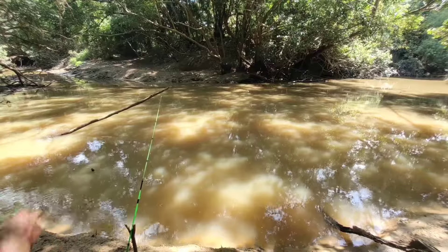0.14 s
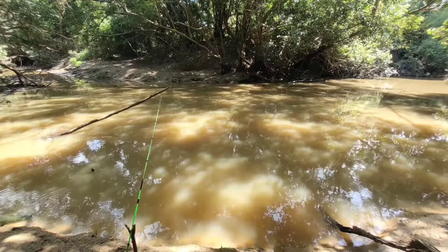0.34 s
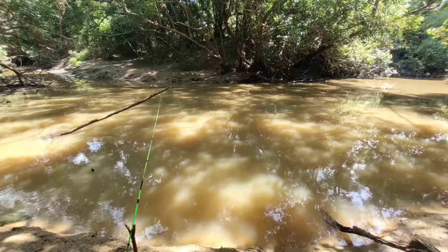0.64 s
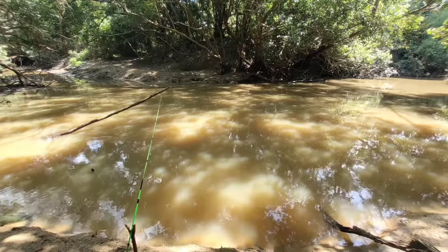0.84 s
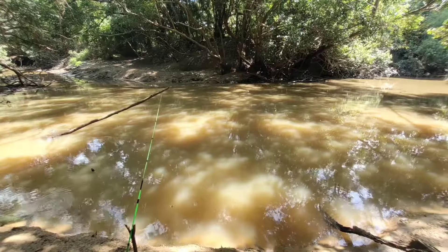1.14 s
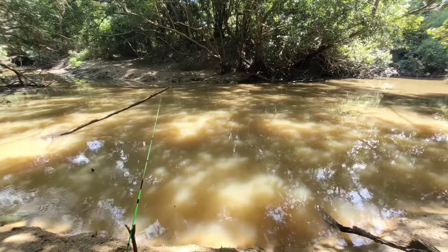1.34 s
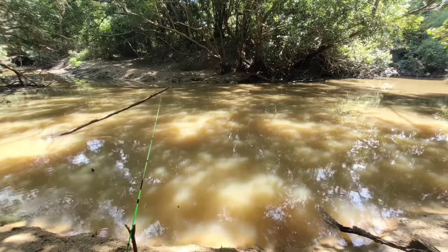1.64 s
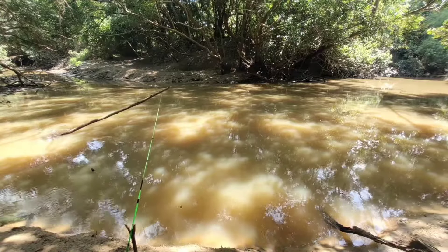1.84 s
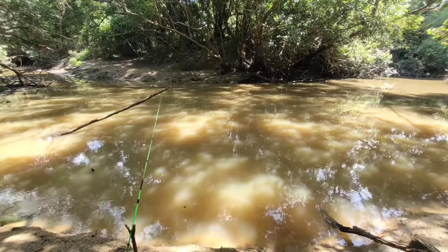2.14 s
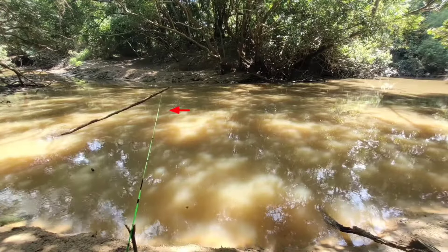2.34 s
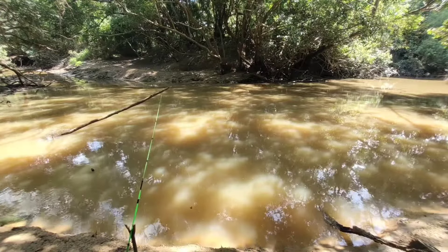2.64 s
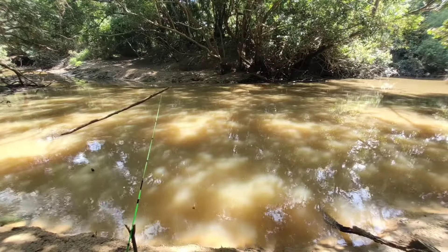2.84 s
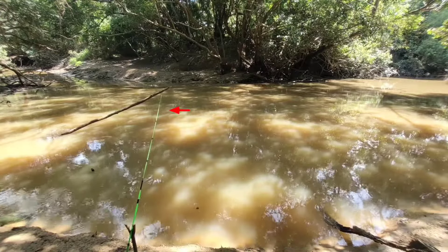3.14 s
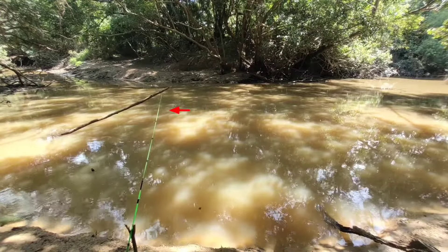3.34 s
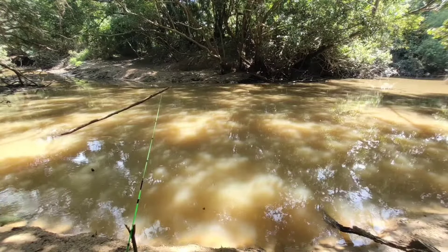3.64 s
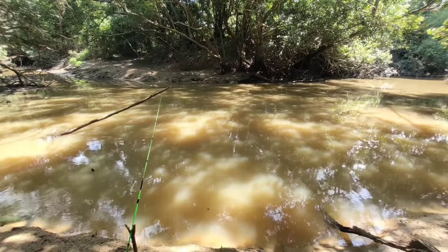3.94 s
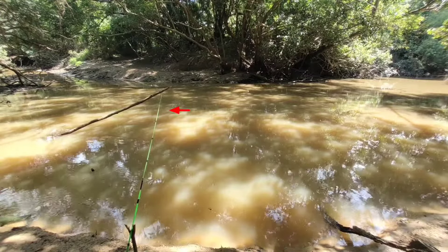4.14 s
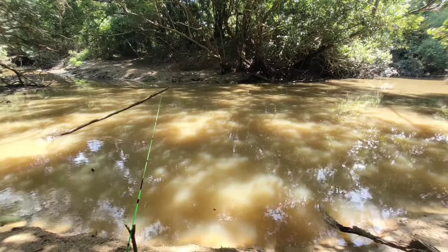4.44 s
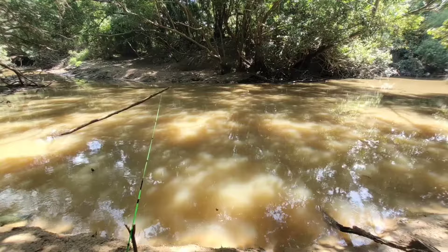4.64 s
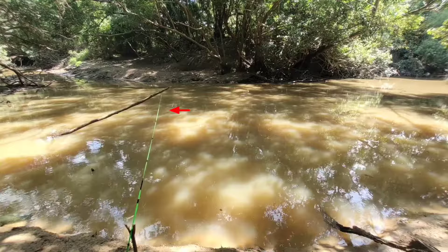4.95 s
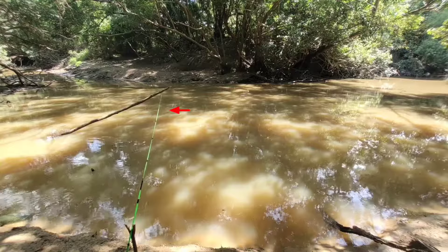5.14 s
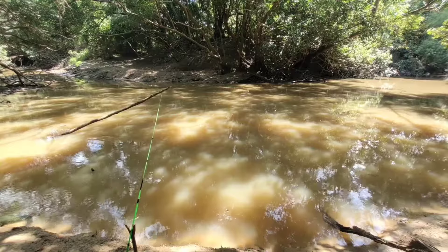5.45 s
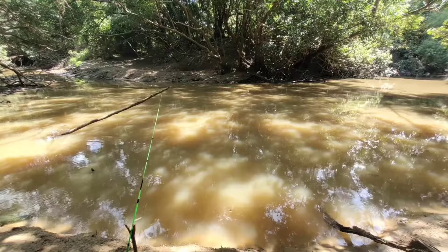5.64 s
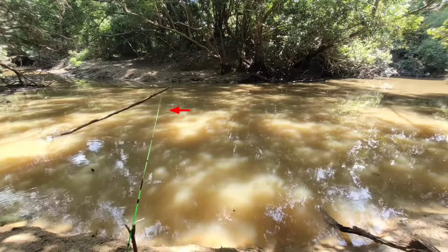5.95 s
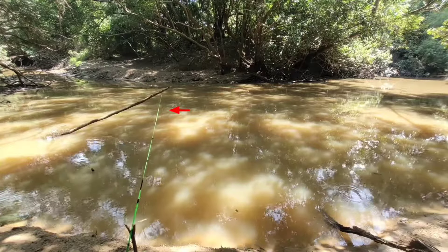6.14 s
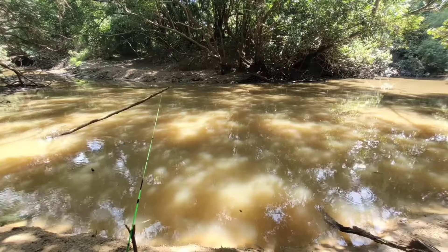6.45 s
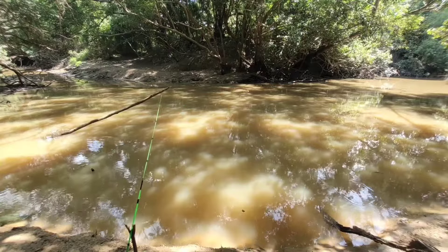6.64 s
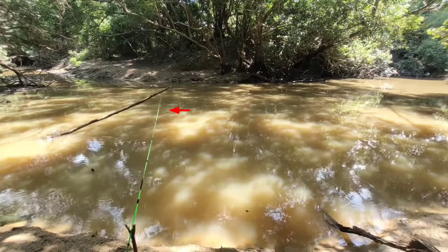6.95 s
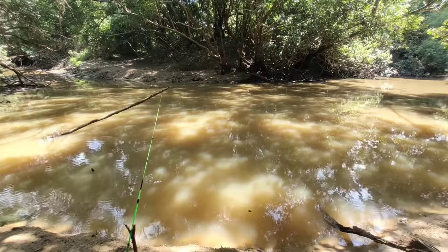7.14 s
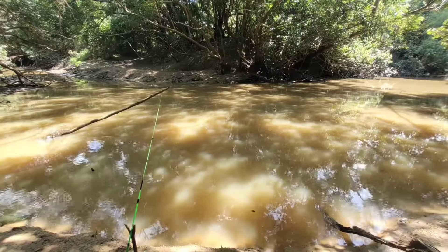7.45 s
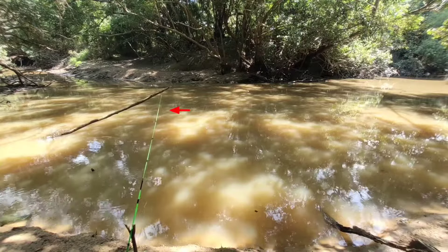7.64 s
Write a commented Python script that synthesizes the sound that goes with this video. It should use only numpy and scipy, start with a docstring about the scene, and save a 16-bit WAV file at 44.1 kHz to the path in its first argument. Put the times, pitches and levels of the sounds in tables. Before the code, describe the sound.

A near bird whistles short arched and falling notes on a wooded riverbank while another trills, over a dense, high, steady insect drone.

```python
"""A near bird whistles arched and falling notes on a wooded riverbank by day: gliding sine tones.
A second bird sings phrases with a low trill, and others whistle further off; decaying noise echoes stand for
the trunks that scatter every note into a grainy tail, which the recorder's noise suppressor cuts short.
A dense insect chorus of shaped noise drones above, with pulsing tones for single crickets and other insects.
Faint hiss, two puffs of breeze and two soft plops lie underneath."""
import sys
import numpy as np
from scipy import signal
from scipy.fft import rfft, irfft, next_fast_len
from scipy.io import wavfile
from scipy.ndimage import uniform_filter1d

SR = 44100
rng = np.random.default_rng(int(sys.argv[2]) if len(sys.argv) > 2 else 0)


def to_wav(s):
    """Save 16-bit WAV."""
    ch = np.atleast_2d(s).T  # columns
    pcm = np.round(np.clip(ch, -1, 1) * 32767)  # PCM
    wavfile.write(sys.argv[1], SR, pcm.astype(np.int16))


N = 343715  # length in samples
LEAD_S = .25  # bird tracks begin this early, so a note can already be sounding at the start

# near bird's two note shapes, before each note's own changes: time_s, pitch_hz, relative_level_db
ARCH_SHAPE = [(0, 3358, -34.5), (.008, 4150, -7.5), (.022, 4693, -7), (.042, 4860, -3.5), (.062, 4535, 0),
              (.088, 3760, -5.5), (.112, 3100, -14), (.13, 2860, -22.5)]
FALL_SHAPE = [(0, 5966, -8.5), (.008, 5800, -15), (.018, 5510, -5), (.037, 4888, -2), (.064, 4177, 0),
              (.092, 3459, -7.5), (.108, 3048, -16), (.125, 2887, -22)]
# when the near bird sings each shape: start_s, level_db, pitch_factor, length_factor
ARCH_NOTES = [(-.125, -30, 1.026, 0.95), (1.156, -29, .99, 0.97), (2.306, -27, 1.004, 1.12),
              (4.711, -24.5, 1, 1), (5.174, -26, 0.999, 1), (5.643, -26, 0.99, 0.96),
              (6.974, -28, .99, 0.96)]
FALL_NOTES = [(1.812, -29, 0.99, 0.99), (2.815, -28, 0.98, 1), (3.299, -27.5, 0.98, 1),
              (3.796, -28.5, 0.98, 1), (4.263, -27, 0.98, 0.99), (6.133, -28.5, 0.98, 0.96),
              (7.504, -29.5, 0.97, 0.96)]

# insect chorus, its tone balance: frequency_hz, relative_level_db
CHORUS_SPECTRUM = [(5000, -45.5), (5500, -36.5), (6000, -24.5), (6500, -7.5), (7100, 0.5), (7600, -4),
                   (8000, -6.5), (8400, -17), (9500, -26.5), (11300, -35), (12200, -24.5), (13000, -11),
                   (14300, -2), (15600, -9)]
CHORUS_DB = -42.5
# louder bursts of single insects, named by rough pitch: start_s, length_s, level_db
BURSTS_7K = [(0.019, 0.072, -43), (0.118, 0.2, -41), (0.332, 0.15, -43.5), (0.507, 0.043, -45),
             (0.569, 0.19, -43), (0.751, 0.053, -49), (0.867, 0.17, -41.5), (1.116, 0.065, -47.5),
             (1.196, 0.037, -45.5), (1.25, 0.055, -42.5), (1.328, 0.143, -40.5), (1.51, 0.13, -40.5),
             (1.725, 0.03, -40), (1.762, 0.18, -41.5), (2.282, 0.031, -44), (2.484, 0.16, -40),
             (2.774, 0.125, -42.5), (3.31, 0.22, -41.5), (3.536, 0.23, -40), (3.984, 0.15, -40.5),
             (4.289, 0.069, -48), (4.516, 0.21, -40.5), (4.804, 0.043, -59), (4.975, 0.15, -43.5),
             (5.66, 0.033, -41.5), (5.985, 0.12, -45.5), (6.182, 0.039, -47), (6.298, 0.21, -43.5),
             (6.52, 0.03, -46.5), (6.785, 0.038, -48), (6.838, 0.1, -47.5), (7.088, 0.031, -44.5),
             (7.278, 0.074, -42), (7.547, 0.055, -43), (7.649, 0.036, -45), (7.729, 0.031, -45)]
BURSTS_8K = [(0.276, 0.037, -52), (0.404, 0.101, -53), (0.571, 0.063, -53), (1.397, 0.037, -56),
             (1.713, 0.149, -48), (2.493, 0.029, -55), (2.539, 0.037, -51), (2.654, 0.161, -51),
             (3.465, 0.109, -53), (3.934, 0.075, -51), (4.067, 0.035, -55), (4.297, 0.029, -53),
             (4.464, 0.079, -52), (4.672, 0.073, -55), (4.947, 0.031, -53), (5.057, 0.043, -53),
             (5.211, 0.047, -53), (5.269, 0.035, -54), (5.402, 0.059, -53), (5.871, 0.063, -51),
             (6.027, 0.033, -56), (6.174, 0.053, -52), (6.256, 0.039, -55), (6.582, 0.029, -55),
             (6.625, 0.041, -54), (6.891, 0.095, -49), (7.152, 0.111, -51), (7.34, 0.125, -53),
             (7.499, 0.033, -54), (7.601, 0.031, -56)]
BURSTS_8K5 = [(0.27, 0.035, -56), (1.753, 0.065, -54), (2.762, 0.039, -55), (3.173, 0.039, -57),
              (3.81, 0.041, -54), (3.973, 0.031, -57), (4.069, 0.047, -53), (4.468, 0.071, -57),
              (6.915, 0.067, -55), (7.164, 0.037, -57), (7.352, 0.051, -54)]
BURSTS_13K = [(4.321, 0.03, -44)]
BURSTS_15K = [(0.16, 0.059, -43), (0.336, 0.029, -51), (0.871, 0.061, -43), (0.968, 0.058, -46),
              (2.421, 0.043, -45), (3.193, 0.059, -49), (3.542, 0.053, -50), (3.644, 0.065, -50),
              (4.762, 0.047, -45), (4.83, 0.065, -49), (5.141, 0.053, -46), (5.702, 0.069, -40),
              (5.961, 0.043, -44), (6.494, 0.113, -42), (7.601, 0.067, -43)]

# steady background hiss, its tone balance: frequency_hz, relative_level_db
HISS_SPECTRUM = [(20, -3.5), (120, -4.5), (650, -9), (1500, -12), (3000, -14), (4500, -13), (5500, -6.5),
                 (6500, -29.5)]
HISS_DB = -75.5

# settling whistles, mostly of far birds: start_s, length_s, first_pitch_hz, last_pitch_hz,
# settling_time_s, level_db, level_change_db, random_waver_hz
SETTLING_WHISTLES = [(0.341, .16, 4374, 4400, .05, -65.5, 0.5, 71),
                     (0.894, 0.096, 4080, 4095, .03, -60, -2, 23),
                     (1.616, .24, 3570, 3540, 0.056, -49, -7, 64),
                     (1.795, 0.054, 1950, 1480, .02, -46.5, -16, 20),
                     (1.835, 0.033, 2990, 3114, 0.0057, -25.5, -8, 8.3),
                     (2.071, 0.34, 3198, 2985, .2, -40, -4, 90),
                     (2.363, .04, 2503, 1510, .012, -41, -24, 20),
                     (3.21, 0.14, 3570, 3720, 0.075, -60.5, 5, 54),
                     (3.311, 0.174, 1770, 2670, 0.032, -41.5, -3, 34.6),
                     (3.45, .3, 4320, 4470, 0.09, -50, -18, 52),
                     (3.652, .2, 3490, 3550, 0.053, -60, -5.5, 43),
                     (4.205, 0.11, 4300, 4410, .02, -59.5, 7, 54),
                     (5.28, .075, 2400, 2900, .035, -38.5, 3, 33),
                     (5.552, 0.089, 3470, 4066, 0.014, -41, -2.5, 45),
                     (6.429, 0.042, 2070, 2303, 0.0091, -50, -6, 110),
                     (6.92, 0.15, 2164, 2746, 0.04, -46, 7.5, 6.8),
                     (7.317, .13, 3660, 3905, 0.012, -40, -18, 54),
                     (7.441, 0.15, 3490, 2860, 0.082, -44.5, 1, 51)]
# faint level peeps: start_s, length_s, level_db
FAINT_PEEPS = [(0.466, 0.1, -62.5), (1.055, 0.16, -59.5), (4.202, 0.085, -61.5), (4.69, 0.097, -62.5),
               (6.551, 0.076, -57.5)]
PEEP_HZ, PEEP_FADE_DB = 2643, -10

# three notes of the trilling bird's phrase: time_s, pitch_hz, relative_level_db
DROP_NOTE = [(0, 3510, -13), (.005, 2360, -11), (0.011, 1895, -30.5), (0.021, 1775, -30)]
FLICK_NOTE = [(0.017, 2770, -4), (0.025, 3914, 2.5), (.032, 4400, 0)]
PEEP_NOTE = [(0.072, 2370, -20.5), (.085, 2610, -19), (.095, 2620, -3.5)]
# phrases: start_s, level_db, flick_level_db
PHRASE_STARTS = [(1.266, -25, -24), (2.321, -23, -23.5), (4.857, -27.5, -26), (7.758, -28.5, -26.5)]
# low trills, each with a closing note: start_s, length_s, level_db, closing_length_s, closing_level_db
LOW_TRILLS = [(1.407, .378, -29, 0.044, -24.5), (2.464, .401, -27, 0.067, -28),
              (4.976, .385, -28.5, 0.027, -26)]
# low trill from start to end: share_of_length, middle_pitch_hz, relative_level_db, upward_sweep_hz
LOW_TRILL_SHAPE = [(0, 2256, -18.5, 500), (.32, 2186, -9, 550), (0.998, 2250, -1, 595)]
# higher trill further off: share_of_length, middle_pitch_hz, relative_level_db, upward_sweep_hz
HIGH_TRILL_SHAPE = [(0, 4496, 0, 800), (.4, 4274, -2, 800), (1, 4180, -3.5, 800)]
# one beat of either trill: share_of_period, share_of_sweep, relative_level_db
TRILL_BEAT = [(0, -0.8, -20), (0.17, -0.097, -1.5), (0.501, .35, -5)]
LOW_BEATS_PER_S, HIGH_BEATS_PER_S = 45.6, 49
HIGH_OFFBEAT_DB = -11  # every second beat of the high trill is weaker
# short winding whistles, one list each: time_s, pitch_hz, level_db
WINDING_WHISTLES = [
    [(5.395, 2784, -31), (5.42, 3090, -38.5), (5.437, 2837, -31), (5.46, 2780, -41), (5.478, 2400, -35.5),
     (5.495, 1980, -40.5), (5.525, 1882, -52.5)],
    [(5.665, 3510, -40), (5.69, 3350, -43), (5.715, 2993, -29.5), (5.79, 3003, -27), (5.862, 2998, -33)],
    [(6.48, 3300, -40), (6.51, 4140, -38.5), (6.535, 4920, -38), (6.575, 4844, -37.5), (6.588, 4400, -43),
     (6.6, 3964, -40.5), (6.64, 3900, -48)],
    [(7.165, 2510, -44), (7.21, 2390, -39.5), (7.25, 2030, -49)],
]

# faint low plops: start_s, pitch_hz, level_db
PLOPS = [(1.745, 263, -65), (2.66, 300, -68.5)]
# breeze on the microphone: start_s, length_s, level_db
BREEZE_PUFFS = [(3.744, 0.22, -80), (6.288, 0.31, -73)]

# noise suppressor: nominal knee (adjusted in suppress), slope, smoothing time and upper limit
KNEE_DB, KNEE_SLOPE, KNEE_HOLD_S, KNEE_TOP_HZ = -71.5, 0.57, 0.015, 5350
TOP_HZ = 15460  # highest pitch the recorder keeps


def undb(db):
    """Turn decibels into a gain, where 20 dB means ten times the amplitude."""
    return 10 ** (np.asarray(db) / 20)


def level(x, db):
    """Scale a sound to a chosen average (rms) level."""
    return x * undb(db) / np.sqrt(np.mean(x ** 2))


def colour(x, points):
    """Filter a sound by the gains of (Hz, dB) points, nearly silencing what lies above the last."""
    size = next_fast_len(len(x))
    hz, db = np.transpose(points)
    axis = np.log(np.arange(size // 2 + 1) * SR / size + 1)
    gain = undb(np.interp(axis, np.log(hz), db, right=-99))
    return irfft(rfft(x, size) * gain, size)[:len(x)]


def walk(rate, size=N):
    """Glide between random values, about `rate` new ones a second, with a spread near 1."""
    k = int(SR / rate)
    steps = np.repeat(rng.standard_normal(size // k + 1), k)
    return 1.4 * uniform_filter1d(steps, k)[:size]


def new_track():
    """Make a silent bird track that begins LEAD_S early."""
    return np.zeros(N + int(LEAD_S * SR))


def flutter(track, spread_db, rate):
    """Make the level flutter quickly at random, so the whistles sound rough."""
    return track * undb(spread_db * walk(rate, size=len(track)))


def add(out, rows, start=0., db=0., pitch=1, edge_s=0.0027, warble_hz=0.):
    """Add one whistle: a sine tone that follows (s, Hz, dB) rows, with soft edges and a random waver."""
    s, hz, row_db = np.transpose(rows)
    t = np.arange(s[0], max(s[-1], s[0] + .002), 1 / SR)
    from_edge_s = np.minimum(t - t[0], t[-1] - t)
    edge = np.sin(np.pi / 2 * np.clip(from_edge_s / edge_s, 0, 1)) ** 2
    waver = warble_hz * walk(199.2, size=len(t))
    # adding up the pitch over time gives the phase of the tone
    tone = np.sin(2 * np.pi * np.cumsum(pitch * np.interp(t, s, hz) + waver) / SR)
    i = int((start + s[0] + LEAD_S) * SR)
    loudness = np.sqrt(2) * undb(db + np.interp(t, s, row_db))
    note = (loudness * edge * tone)[:len(out) - i]
    out[i:i + len(note)] += note


def near_bird():
    """The near bird: pure whistles whose pitch arches up and over, or falls."""
    near = new_track()
    for shape, notes in ((ARCH_SHAPE, ARCH_NOTES), (FALL_SHAPE, FALL_NOTES)):
        for s, db, pitch, stretch in notes:
            add(near, np.array(shape) * [stretch, 1, 1], s, db, pitch, warble_hz=24.8)
    return flutter(near, 2.1, 150.0)


def trees(dry, direct_db):
    """The direct sound, a quick blur from the branches, then dense scatter from the trunks that dies away."""
    t = np.arange(int(1.2 * SR)) / SR
    path = 0
    # seconds to fade by 60 dB, level in dB, rise time in s: trunks, then branches round the perch
    for t60, db, rise_s in ((0.76, -1, 0.0026), (0.031, -2, .001)):
        scatter = rng.standard_normal(len(t)) * undb(-60 * t / t60) * (1 - np.exp(-t / rise_s))
        path = path + scatter * undb(db) / np.sqrt(np.sum(scatter ** 2))
    path[0] = undb(direct_db)
    return signal.fftconvolve(dry, path)[int(LEAD_S * SR):][:N]


def chorus():
    """The drone of countless wing scrapes, made from noise kept to the insects' pitches."""
    # scrapes come in unequal sizes, so the drone is slightly grainy
    size_db = 1.0 * walk(300) + 0.7 * walk(16) + .3 * walk(2.64)
    scrapes = rng.standard_normal(N) * undb(size_db)
    return level(colour(scrapes, CHORUS_SPECTRUM), CHORUS_DB)


def stridulate(hz, rate, depth, waver_hz):
    """A wing tone in uneven strokes, about `rate` a second; its pitch wavers a little."""
    stroke = np.cos(2 * np.pi * np.cumsum(rate * (1 + 0.1495 * walk(13))) / SR)
    tone = np.sin(2 * np.pi * np.cumsum(hz + waver_hz * walk(60)) / SR)
    return level(tone * (1 + depth * stroke) * undb(2.8 * walk(30)), 0)


def bursts(rows, chirr_db, patchy_db):
    """Loudness of one insect's bursts, over the broken chirr of its neighbours."""
    gate = undb(chirr_db + patchy_db * np.clip(walk(25), -3, 1.2))
    for s, length, db in rows:
        i, n = int(s * SR), int(max(length, .01) * SR)
        gate[i:i + n] += (undb(db) * signal.windows.tukey(n, .4))[:N - i]
    return gate


def single_insects():
    """Crickets and other insects: steady wing tones that swell in bursts above the chorus."""
    cricket = bursts(BURSTS_7K, -57.5, 6.0) * stridulate(6798, 51, 0.56, 22.1)
    lower = bursts(BURSTS_8K, -61.5, 6.5) * stridulate(8150, 21.0, .6, 25.0)
    upper = bursts(BURSTS_8K5, -66.0, 6.0) * stridulate(8490, 21.0, .6, 25.0)
    high = bursts(BURSTS_13K, -67.5, 7.8) * stridulate(12920, 45.0, .4, 17.0)
    top = bursts(BURSTS_15K, -54.0, 4.1) * stridulate(15190, 45.0, .4, 20.0)
    return cricket + lower + upper + high + top


def hiss():
    """Faint steady hiss: noise with a fixed tone balance."""
    return level(colour(rng.standard_normal(N), HISS_SPECTRUM), HISS_DB)


def glide(length, first_hz, last_hz, settle_s, change_db):
    """Rows of a note whose pitch settles towards its last value while the level changes evenly."""
    t = np.linspace(0, length, 24)
    hz = last_hz + (first_hz - last_hz) * np.exp(-t / max(settle_s, .001))
    return np.transpose([t, hz, change_db * t / length])


def settling_whistles(echoing):
    """Soft-edged notes whose pitch settles: mostly far birds, and one second closing note of the triller."""
    for s, length, first_hz, last_hz, settle_s, db, change_db, warble_hz in SETTLING_WHISTLES:
        rows = glide(length, first_hz, last_hz, settle_s, change_db)
        add(echoing, rows, s, db, edge_s=0.018, warble_hz=warble_hz)


def faint_peeps(track):
    """Faint peeps that hold one pitch, but for a slight waver, while they fade."""
    for s, length, db in FAINT_PEEPS:
        rows = [(0, PEEP_HZ, 0), (length, PEEP_HZ, PEEP_FADE_DB)]
        add(track, rows, s, db, warble_hz=12.4)


def phrases(clear, echoing):
    """The trilling bird's phrase: a quick drop, an upward flick and a peep."""
    for s, db, flick_db in PHRASE_STARTS:
        add(echoing, DROP_NOTE, s, db, warble_hz=30.0)
        add(clear, FLICK_NOTE, s, flick_db, warble_hz=58.0)
        add(clear, PEEP_NOTE, s, db, warble_hz=58.0)


def trill(out, shape, start, length, level_db, rate, offbeat_db=0.):
    """Add a run of quick upward flicks at a steady rate, each a little unlike the last."""
    share, hz, db, sweep = np.transpose(shape)
    chance = rng.standard_normal((24, 3))  # at most 24 beats
    for k, s in enumerate(np.arange(0, length, 1 / rate)[:len(chance)]):
        late, size, sharp = chance[k]
        middle_hz, beat_db, sweep_hz = (np.interp(s / length, share, col) for col in (hz, db, sweep))
        beat = np.array(TRILL_BEAT) * [1 / rate, sweep_hz, 1] + [0, middle_hz, beat_db]
        this_db = level_db + offbeat_db * (k % 2) + size
        add(out, beat, start + s + 0.00087 * late, this_db, 1 + 0.012 * sharp)


def low_trills(track):
    """Low trills, each closed by a note that jumps up and holds."""
    for s, length, db, close_s, close_db in LOW_TRILLS:
        trill(track, LOW_TRILL_SHAPE, s, length, db, LOW_BEATS_PER_S)
        closing = glide(close_s, 2480, 3113, 0.0078, -5.5)
        add(track, closing, s + length, close_db, warble_hz=8.8)


def plops():
    """Soft low plops: short sine tones that swell and fade in a bell shape."""
    t = np.arange(N) / SR
    return sum(undb(db) * np.exp(-((t - s) / 0.0078) ** 2) * np.sin(2 * np.pi * hz * t)
               for s, hz, db in PLOPS)


def high_trill(echoing):
    """One higher trill further off, with every second beat weaker."""
    trill(echoing, HIGH_TRILL_SHAPE, 1.943, .38, -18.5, HIGH_BEATS_PER_S, HIGH_OFFBEAT_DB)


def breeze():
    """Low puffs of breeze on the microphone: rumbling noise that rises fast and dies away."""
    puffs, t = np.zeros(N), np.arange(N) / SR
    for s, length, db in BREEZE_PUFFS:
        puffs += undb(db) * np.interp(t, [s, s + 0.022, s + length], [0, 1, 0])
    rumble = level(colour(rng.standard_normal(N), [(20, -10), (90, 13), (200, -2), (500, -51)]), 0)
    return puffs * rumble


def winding_whistles(track):
    """Short whistles whose pitch winds up and down or sinks."""
    for rows in WINDING_WHISTLES:
        add(track, rows, warble_hz=24.4, edge_s=.006)


def other_birds():
    """All other birds' notes on a clearer and a more echoing track, before the echoes of the trees."""
    clear, echoing = new_track(), new_track()
    settling_whistles(echoing)
    faint_peeps(clear)
    phrases(clear, echoing)
    low_trills(clear)
    high_trill(echoing)
    winding_whistles(clear)
    return flutter(clear, 1.2, 90.0), flutter(echoing, 2.5, 70.0)


def suppress(x):
    """Noise suppressor: turns down each band up to KNEE_TOP_HZ as it sinks below a knee, chopping tails."""
    hop = 128  # samples between analysis frames
    hz, _, bins = signal.stft(x, SR, nperseg=512, noverlap=512 - hop)
    keep = np.exp(-hop / SR / KNEE_HOLD_S)
    now = np.abs(bins) ** 2
    smooth = signal.lfilter([1 - keep], [1, -keep], uniform_filter1d(now, size=3, axis=0), axis=1)
    power = np.maximum(smooth, now)  # opens at once, closes slowly
    # the treble must be louder to pass
    knee_db = KNEE_DB + 3.0 * np.log2(np.clip(hz, 2000, 6000) / 2800)[:, None]
    gain = (power ** 2 / (power ** 2 + undb(4.045 * knee_db))) ** KNEE_SLOPE
    gain[hz > KNEE_TOP_HZ] = 1
    return signal.istft(bins * gain, SR, nperseg=512, noverlap=512 - hop)[1][:N]


def scene():
    """Birds heard through the trees, and insects."""
    near = near_bird()
    clear, echoing = other_birds()
    birds = trees(near, -6.5) + undb(-5.5) * trees(clear, 0.34) + undb(-6.0) * trees(echoing, -6.0)
    return (birds + chorus() + single_insects())[None]


def record(dry):
    """The recorder suppresses faint sound, keeps a faint background and cuts the top."""
    heard = suppress(dry[0]) + hiss() + plops() + breeze()
    top_cut = signal.ellip(14, .3, 80, TOP_HZ, fs=SR, output="sos")
    return signal.sosfilt(top_cut, heard)[None]


dry = scene()
out = record(dry)
to_wav(out)
```